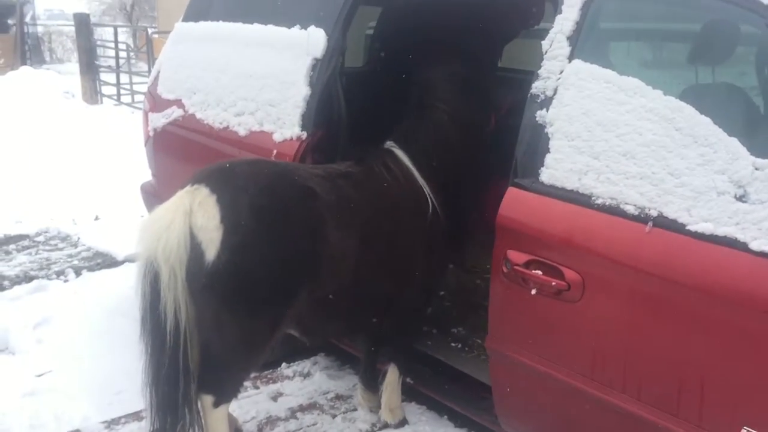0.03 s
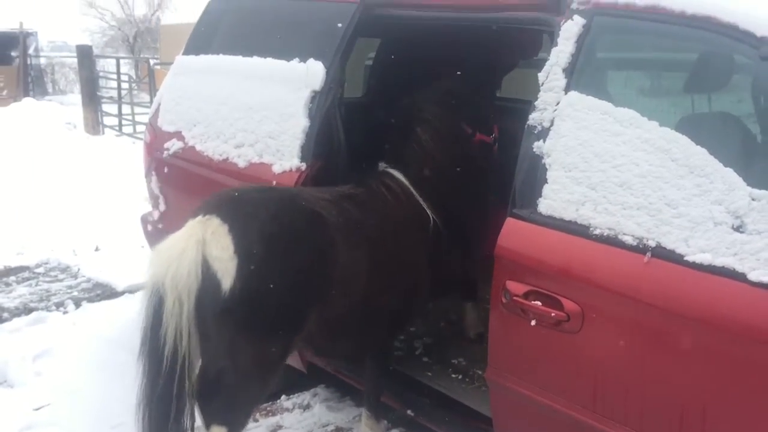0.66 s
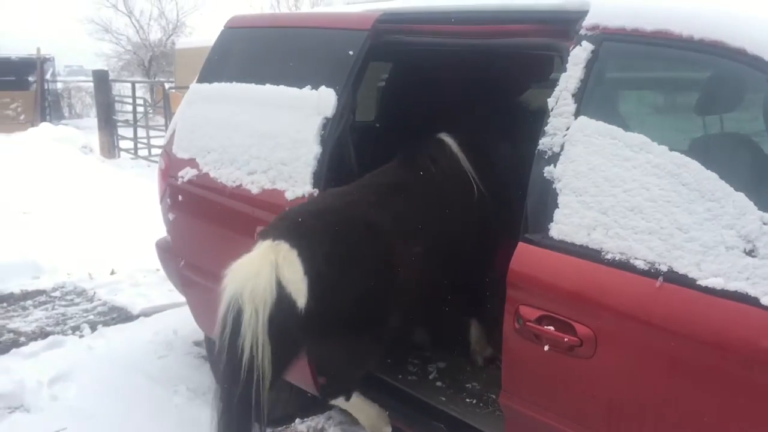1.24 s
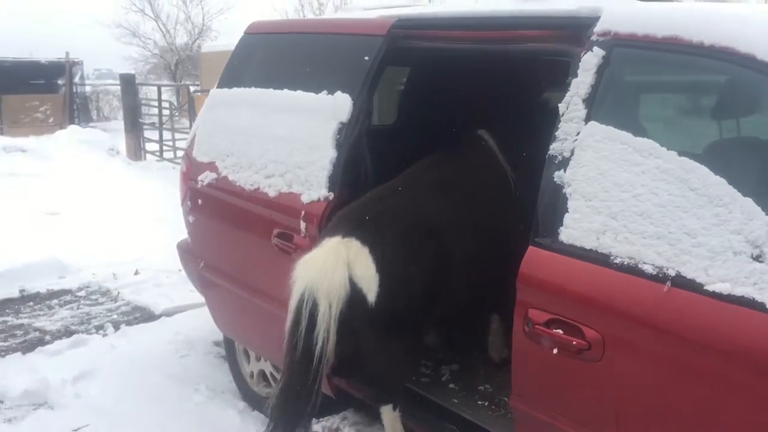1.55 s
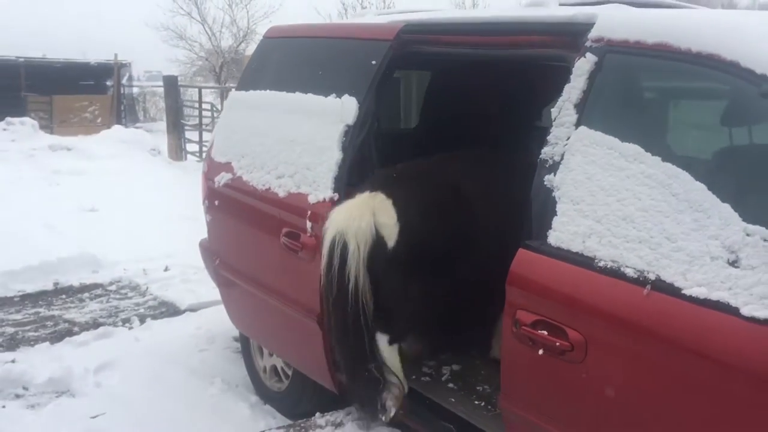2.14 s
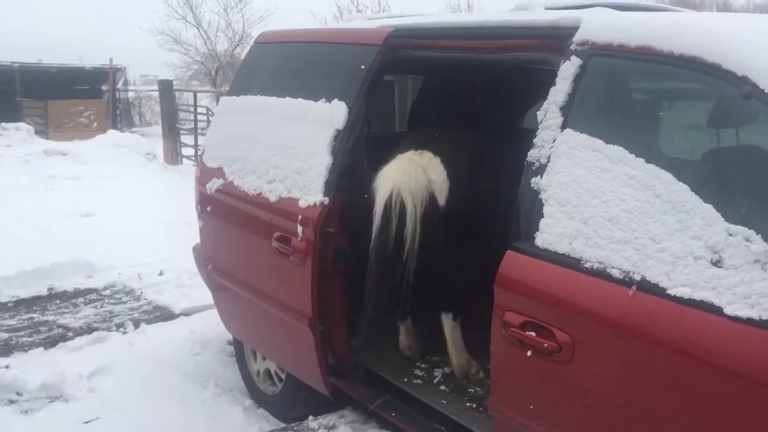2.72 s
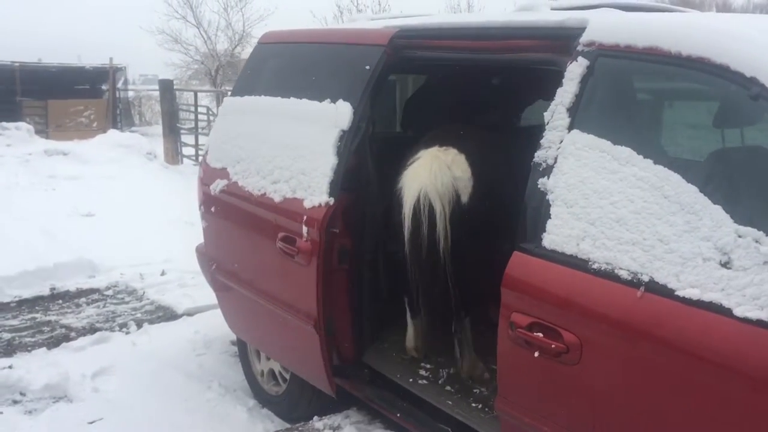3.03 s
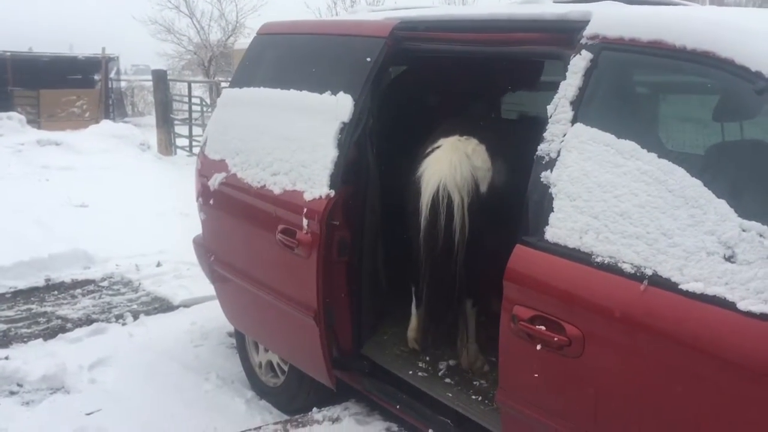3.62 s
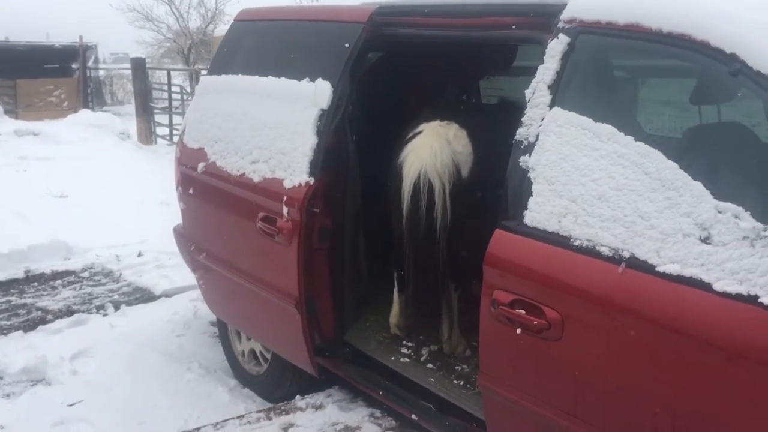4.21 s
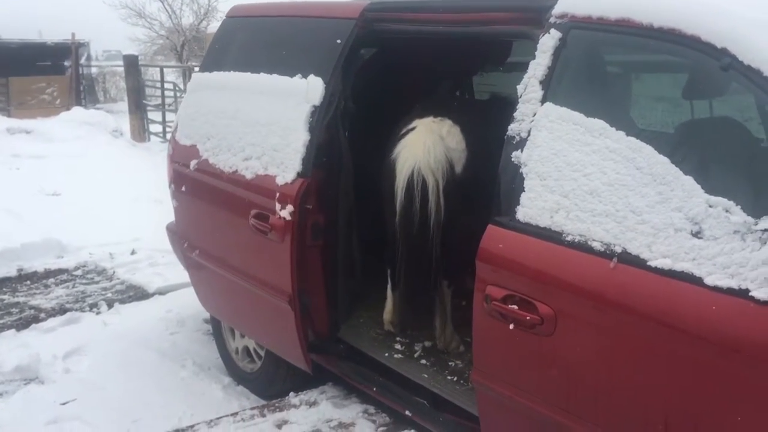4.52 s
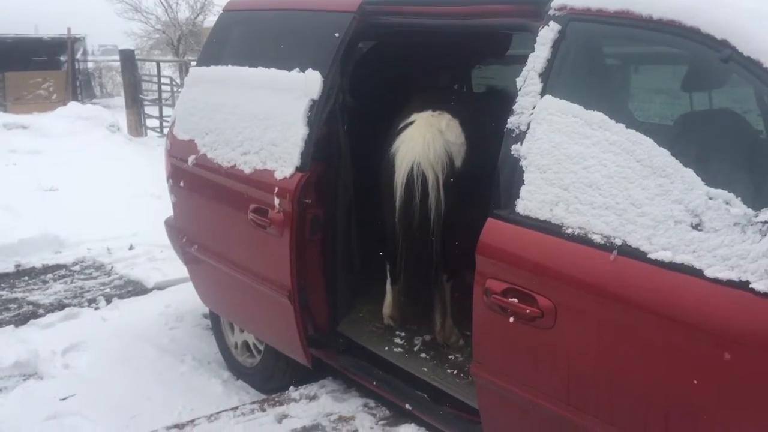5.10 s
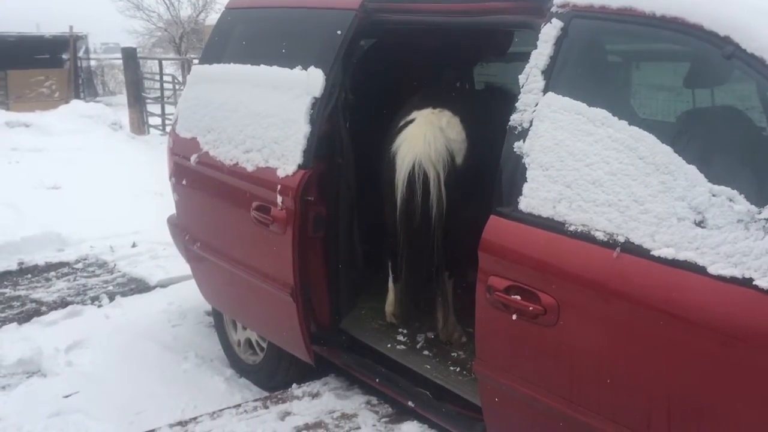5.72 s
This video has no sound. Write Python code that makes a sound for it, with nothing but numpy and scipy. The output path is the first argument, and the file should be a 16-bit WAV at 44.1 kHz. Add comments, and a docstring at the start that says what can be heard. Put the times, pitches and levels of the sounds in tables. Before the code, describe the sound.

A small horse climbs into a van, its hooves making irregular hollow knocks on the door sill and low, briefly booming thuds on the floor. Light scuffs and tiny ticks of ice fall between the steps, and one stamp lands louder than the rest. The steps end about halfway through, leaving only faint shuffling. It is heard from nearby in a quiet outdoor yard.

```python
"""A small horse boards a van

A small horse climbs from the snow through the side door. Its hooves excite the modes of sill and
panels as knocks, and its weight drives the carpeted floor into thuds and a low boom, which the cabin
briefly reverberates. Hooves scuff over packed snow by sliding friction, and bits of ice tick.
Then the horse stands inside, and only soft shuffling is left over a quiet winter yard."""
import sys
import numpy as np
from scipy import signal
from scipy.fft import rfft, irfft, next_fast_len
from scipy.io import wavfile
from scipy.ndimage import map_coordinates

SR = 44100
rng = np.random.default_rng(int(sys.argv[2]) if len(sys.argv) > 2 else 0)


def to_wav(s):
    """Save 16-bit WAV."""
    ch = np.atleast_2d(s).T  # columns
    pcm = np.round(np.clip(ch, -1, 1) * 32767)  # PCM
    wavfile.write(sys.argv[1], SR, pcm.astype(np.int16))


N = 258426
T = np.arange(SR // 2) / SR  # seconds since an impact


def amp(db):
    """Decibels to amplitude ratio."""
    return 10 ** (np.asarray(db) / 20)


def unit(x):
    """Normalisation to rms 1."""
    return x / np.sqrt(np.mean(x ** 2) + 1e-20)


def burst(x):
    """Normalisation of a transient to the energy of 20 ms at rms 1."""
    return x * np.sqrt(.02 * SR / (np.sum(x ** 2) + 1e-20))


def along(points, hz):
    """Interpolation of (frequency, value) points on a logarithmic frequency axis."""
    freqs, values = np.transpose(points)
    return np.interp(np.log(hz + 1), np.log(freqs + 1), values)


def filtered(x, gain):
    """Zero-phase filtering: the spectrum is multiplied by gain(hz)."""
    size = next_fast_len(len(x) + 8192)
    return irfft(rfft(x, size) * gain(np.fft.rfftfreq(size, 1 / SR)), size)[:len(x)]


def noise(spectrum, size, spiky_db=0):
    """Coloured noise of rms 1; random amplitude modulation in half-millisecond grains makes it gritty."""
    grains = np.repeat(rng.standard_normal(size // 22 + 1), 22)[:size]
    white = rng.standard_normal(size) * amp(spiky_db * grains)
    return unit(filtered(white, lambda hz: amp(along(spectrum, hz))))


def fade(t60, attack_s):
    """Envelope of a damped vibration: a quick rise, then exponential decay by 60 dB in t60 seconds."""
    return (1 - np.exp(-T / attack_s)) * np.exp(-np.log(1000) * T / t60)


def swell(peak_s, rise_s, fall_s):
    """Gaussian envelope with its own width on each side of the peak."""
    t = np.arange(N) / SR - peak_s
    width_s = np.where(t < 0, rise_s, fall_s)
    return np.exp(-.5 * np.minimum((t / width_s) ** 2, 50))


def add(track, start_s, x):
    """Superposition of x on the track from start_s."""
    part = track[max(round(start_s * SR), 0):][:len(x)]
    part += x[:len(part)]


def reflections(x, spread_s=.006, strength=0.86, count=6):
    """Comb filtering: echoes from nearby surfaces interfere, giving each spot its own hollow colour."""
    out = x.copy()
    for delay_s, gain in rng.uniform([.0005, -1], [spread_s, 1], (count, 2)):
        add(out, delay_s, strength * gain * x)
    return out * np.linalg.norm(x) / np.linalg.norm(out)


# spectrum of the outdoor air: frequency_hz, density_db
YARD_SPECTRUM = [(15, -30), (25, -10), (44, 0.5), (64, 0), (102, -4.5), (354, -10), (394, -16.5),
                 (754, -12), (863, -15.5), (1230, -19), (1400, -24), (2480, -27), (3160, -27.5),
                 (5280, -31.5), (16000, -38.5)]
# its slow drift in level: time_s, level_db
YARD_LEVEL = [(0, -61), (2.7, -60), (4.2, -60.5), (5.86, -63)]


def yard():
    """Ambient noise: faint, nearly steady outdoor air with its greatest density in the bass."""
    level_db = np.interp(np.arange(N) / SR, *np.transpose(YARD_LEVEL))
    return amp(level_db) * noise(YARD_SPECTRUM, N)


# spectra of a tick's hollow body and its bright edge: frequency_hz, density_db
CLACK_SPECTRUM = [(900, -38), (1600, -9), (2300, 4), (3700, 5), (5000, -6), (7000, -6), (8500, -45),
                  (16000, -15)]
SPARKLE_SPECTRUM = [(1500, 13), (5000, -6), (9000, 13.5), (12500, 15), (16000, 11)]
# impacts of bits of ice: start_s, clack_db, sparkle_db, clack_t60_s
ICE_TICKS = [ (0.042, -46.5, -64, 0.038), (0.049, -52.5, -67, 0.094), (0.301, -53, -57.5, 0.095),
             (0.687, -60, -55.5, 0.044), (0.708, -65, -58, .026), (1.835, -62, -56, 0.014),
             (2.21, -63, -48, 0.0074), (2.702, -87, -58.5, 0.091), (2.865, -73, -83, .05),
             (2.902, -73.5, -82, .045), (4.242, -71, -62.5, .09), ]


def ice_ticks():
    """Impact of small hard bodies: a short clack, and a bright edge that decays twice as fast."""
    out = np.zeros(N)
    for start_s, clack_db, sparkle_db, t60 in ICE_TICKS:
        clack = noise(CLACK_SPECTRUM, len(T), spiky_db=4.5) * fade(t60, attack_s=0.00039)
        clack = reflections(clack, spread_s=0.0051, strength=0.44)
        sparkle = noise(SPARKLE_SPECTRUM, len(T)) * fade(.5 * t60, attack_s=0.0006)
        add(out, start_s, amp(clack_db) * burst(clack) + amp(sparkle_db) * burst(sparkle))
    return out


def thud(hz, rise_at_180hz_s=0.0058):
    """Heavily damped oscillation: weight bounces on the floor for a few cycles that swell and die."""
    rise_s = rise_at_180hz_s * (180 / hz) ** .5
    age = T / rise_s
    return burst(age ** 2 * np.exp(-2 * age) * np.sin(2 * np.pi * hz * T))


# low modes of the floor pan: pitch_hz, level_db, t60_s
FLOOR_MODES = [(67.7, -0.5, 0.29), (80.7, 4, 0.15), (104.2, -14, 0.82), (141.6, 4, 0.13), (170.8, -4, 0.24),
               (191.2, -4, 0.18), (251, -22.5, 0.34)]


def floor_boom():
    """Free vibration of a plate: the floor pan takes up the load slowly and rings on in its low modes."""
    out = np.zeros(len(T))
    for hz, db, t60 in FLOOR_MODES:
        gain = amp(db + 0.95 * rng.standard_normal())
        out += gain * np.sin(2 * np.pi * hz * T) * fade(t60, attack_s=0.0077)
    return burst(out)


def tread(db, hz):
    """Transient loading: weight lands with a thud, the softer the slower, booms and rebounds."""
    rise_at_180hz_s = 0.0061 * 2 ** ((-24 - db) / 32)  # doubles for every 32 dB softer
    boom_db = -18 * max(np.log2(hz / 180), 0)  # thuds above 180 Hz stir the floor pan less
    overtone = amp(-13) * thud(1.765 * hz)
    out = thud(hz, rise_at_180hz_s) + overtone + amp(boom_db) * floor_boom()
    rebound = amp(-8.5) * thud(0.88 * hz)
    add(out, 0.03157, rebound)
    return amp(db) * out


# a leg putting weight on the floor: start_s, level_db, pitch_hz
TREADS = [ (0.208, -49.5, 161), (0.266, -44.5, 174), (0.691, -34.5, 353), (0.714, -39, 153),
          (0.865, -38.5, 162), (1.174, -47, 137.5), (1.285, -29.5, 146), (1.357, -44, 107),
          (1.483, -35, 127.5), (1.692, -38, 120), (1.783, -32.5, 141), (2.164, -32, 205),
          (2.187, -25, 196.6), (2.230, -29, 120), (2.281, -45, 103), (2.528, -46, 104), (3.044, -48.5, 75),
          (3.935, -52, 161.5), ]


def treads(shift_count=16, shift_db=-53, shift_hz=142.6):
    """Repeated excitation: firm steps, and small shifts of weight between them, keep the floor moving."""
    out = np.zeros(N)
    for start_s, db, hz in TREADS:
        add(out, start_s, tread(db, hz))
    times_s, gap_s = np.linspace(0.87, 1.9, shift_count, retstep=True)
    for time_s in times_s:
        late, size, pitch = rng.uniform(-1, 1, 3)
        shift = tread(shift_db + 2 * size, shift_hz * 2 ** (0.33 * pitch))
        add(out, time_s + .5 * gap_s * late, shift)
    return out


# modes of the hard plastic sill trim: pitch_hz, level_db, t60_s
SILL_MODES = [(1955, -8.5, 0.041), (2430, -9, 0.039), (2580, -4, 0.019), (2910, -8, 0.012),
              (3020, -21, 0.006), (3170, -2, 0.01), (3320, 11, 0.01), (3530, -7, 0.015), (4280, -4, 0.035)]


def sill(contact, ring_db):
    """Resonance: a contact is heard directly and convolved with the trim's short impulse response."""
    ring = sum(amp(db) * np.cos(2 * np.pi * hz * T) * np.exp(-np.log(1000) * T / t60)
               for hz, db, t60 in SILL_MODES)
    ringing = signal.fftconvolve(contact, ring / np.linalg.norm(ring))[:len(contact)]
    return contact + amp(ring_db) * ringing


# spectrum of hoof horn meeting the sill: frequency_hz, density_db
CRACK_SPECTRUM = [(500, -5.5), (1100, -1.5), (1600, -4), (2100, -3.5), (2600, -7.5), (3400, -13),
                  (3800, -11.5), (4400, -17), (5200, -19.5), (9000, -23.5), (16000, -42.5)]


def crack(db, hard_blow_db=-30):
    """Brief contact is broadband: horn snaps on the sill and chatters; soft blows barely ring the trim."""
    snap = fade(t60=0.0043, attack_s=0.00056)
    chatter = amp(-13) * fade(t60=0.049, attack_s=0.0046)
    contact = noise(CRACK_SPECTRUM, len(T)) * (snap + chatter)
    return amp(db) * burst(sill(contact, ring_db=-3 + min(db - hard_blow_db, 0)))


# modes of the sill and floor panels: pitch_hz, weight_db
PANEL_MODES = [(270, 14), (302, 13.5), (335, 10.5), (378, 0.5), (445, 4), (505, -3.5), (590, -1),
               (680, -1.5), (728, -6.5), (802, -2), (883, -3.5), (990, -3), (1090, -38), (1258, -3),
               (1421, -5), (1556, -17)]


def knock(centre_hz, width_octaves=0.65):
    """Selective excitation: each spot and hardness of contact favours its own band of panel modes."""
    def favour(hz):
        return 1 / (1 + (np.log2((hz + 1) / centre_hz) / width_octaves) ** 2) ** 1.8

    hz, db = np.transpose(PANEL_MODES)
    gains = amp(db + 2 * rng.standard_normal(len(hz))) * favour(hz)
    phases = rng.uniform(0, 2 * np.pi, (len(hz), 1))
    modes = gains @ np.sin(2 * np.pi * hz[:, None] * T + phases)
    trim = filtered(rng.standard_normal(len(T)), favour)  # loose trim adds countless small modes
    t60 = 0.097 / (1 + (centre_hz / 720) ** 8.6)  # damping climbs steeply above 720 Hz
    return burst((unit(modes) + amp(-11) * unit(trim)) * fade(t60, attack_s=0.4 / centre_hz))


# hooves striking the sill and floor: start_s, knock_db, centre_hz, crack_db
HOOF_STRIKES = [ (0.255, -48, 630, -58.5), (0.267, -50, 483, -75), (0.686, -38, 420, -46.5),
                (0.693, -27, 680, -41), (0.709, -33.5, 746, -39), (0.851, -40, 560, -68),
                (1.075, -49.5, 560, -72), (1.279, -26, 760, -30), (1.286, -32, 424, -62),
                (1.481, -38.5, 412, -50.5), (1.627, -56, 730, -64.5), (1.683, -52, 590, -62.5),
                (1.765, -31.5, 594, -68), (1.785, -35.5, 700, -57.5), (1.883, -38, 835, -86),
                (2.163, -44, 477, -58), (2.186, -32.5, 683, -45), (2.208, -42, 680, -42),
                (2.493, -51, 654, -55.5), (2.512, -47, 810, -56), ]


def hoof_strikes():
    """Impulsive excitation: horn cracks on the sill and knocks the panels, over a small thud."""
    out = np.zeros(N)
    tap = amp(-6.5) * thud(hz=194.3)
    for start_s, knock_db, centre_hz, crack_db in HOOF_STRIKES:
        add(out, start_s, crack(crack_db) + amp(knock_db) * (knock(centre_hz) + tap))
    return out


# spectra of crushed grains, rubbed floor and squeaking snow: frequency_hz, density_db
GRIT_SPECTRUM = [(400, -43), (1200, 4.5), (2100, 3), (3400, -0.5), (5000, -9), (8000, -15.5), (16000, -27)]
RUB_SPECTRUM = [(80, -1.5), (200, 0.5), (500, -1), (800, 2), (1100, -9.5), (1700, -18), (4000, -35.5)]
SQUEAK_SPECTRUM = [(1200, -63), (1750, -0.5), (1950, 2.5), (2180, 7.5), (2450, -31), (3500, -66)]
# hoof slides over packed snow and carpet: peak_s, rise_s, grit_db, rub_db
SCUFFS = [ (0.27, 0.013, -64, -61.5), (0.883, 0.04, -60, -52.5), (0.972, 0.021, -64.5, -59.5),
          (1.1, .011, -62.5, -49), (1.374, 0.015, -61.5, -58), (1.492, 0.011, -53.5, -43),
          (1.754, 0.043, -54, -49), (2.041, 0.0098, -53.5, -63), (2.203, 0.022, -46.5, -36.5),
          (2.255, 0.017, -63.5, -46.5), (2.515, 0.017, -52, -42.5), ]


def scuffs():
    """Sliding friction: a hoof crushes snow and rubs the floor; the squeak grows with the rubbing."""
    strokes = np.array([swell(peak_s, rise_s, 0.9 * rise_s) for peak_s, rise_s, *_ in SCUFFS])
    grit_envelope, rub_envelope = amp(np.array(SCUFFS)[:, 2:]).T @ strokes
    crunch = reflections(grit_envelope * noise(GRIT_SPECTRUM, N, spiky_db=7.5))
    rub = noise(RUB_SPECTRUM, N, spiky_db=3.5)
    squeak = amp(-12) * noise(SQUEAK_SPECTRUM, N, spiky_db=-8.0)
    return crunch + rub_envelope * (rub + squeak)


# modes of the hollow door step: pitch_hz, relative_db, rise_at_180hz_s
STEP_MODES = [(190, -1.5, 0.0061), (466, -5, 0.012), (667, -20.5, 0.0036)]


def step_thump(start_s=1.764, level_db=-17.5):
    """Damped resonance: the hollow step answers a hind hoof's stamp with a few short, pitched modes."""
    out = np.zeros(N)
    for hz, relative_db, rise_at_180hz_s in STEP_MODES:
        add(out, start_s, amp(level_db + relative_db) * thud(hz, rise_at_180hz_s))
    return out


# spectrum of soft friction: frequency_hz, density_db
RUSTLE_SPECTRUM = [(400, -1.5), (850, 5), (1150, -1.5), (1500, 4.5), (2000, 5), (2600, 5), (3300, 2),
                   (5000, -3), (9000, -8.5), (16000, -29)]
# small movements of the standing horse: peak_s, rise_s, rustle_db, fizz_db
SHUFFLES = [ (4.026, 0.017, -65.5, -86), (4.15, 0.013, -65.5, -83), (4.524, 0.02, -65, -80),
            (4.68, 0.029, -58, -65), (4.861, .015, -61, -69), (4.919, .022, -60, -74),
            (5.073, 0.0046, -68, -71), (5.15, 0.041, -72.5, -80), (5.281, 0.019, -57.5, -76),
            (5.477, 0.013, -58.5, -59), (5.53, 0.029, -63, -91), (5.7, 0.011, -64.5, -84),
            (5.825, 0.017, -56.5, -58.5), ]


def shuffles():
    """Light friction: short strokes, each coloured by its own reflections, over a long, faint rustle."""
    rustle = noise(RUSTLE_SPECTRUM, N, spiky_db=2) + amp(-7.5) * noise(SQUEAK_SPECTRUM, N, spiky_db=5.5)
    fizz = noise(SPARKLE_SPECTRUM, N, spiky_db=12)
    out = amp(-72.5) * swell(peak_s=4.87, rise_s=0.69, fall_s=0.84) * rustle
    for peak_s, rise_s, rustle_db, fizz_db in SHUFFLES:
        friction = amp(rustle_db) * rustle + amp(fizz_db) * fizz
        out += reflections(swell(peak_s, rise_s, 0.85 * rise_s) * friction, strength=0.97)
    return out


# reverberation time of the cabin: frequency_hz, t60_s
CABIN_DECAY = [(100, 0.41), (500, 0.19), (2500, 0.13), (6000, 0.17), (15000, 0.26)]


def cabin(x):
    """Reverberation: absorption by the upholstery keeps the tail short, and the bass lasts longest."""
    hz, t, spectra = signal.stft(rng.standard_normal(len(T)), SR, nperseg=256)
    decay = np.exp(-np.log(1000) * t / along(CABIN_DECAY, hz)[:, None])
    _, tail = signal.istft(spectra * decay, SR, nperseg=256)
    response = np.pad(tail / np.linalg.norm(tail), (SR // 200, 0))  # arrives 5 ms late
    return signal.fftconvolve(x, response)[:N]


def scene():
    """Direct and reverberant sound add; the step lies in the open and couples less to the cabin."""
    horse = hoof_strikes() + treads() + scuffs()
    step = step_thump()
    reverberation = amp(-13.0) * cabin(horse + amp(-3.5) * step)
    return (horse + step + reverberation + ice_ticks() + shuffles() + yard())[None]


def record(dry, bass_hz=50, top_hz=16100):
    """Band limiting: a small microphone loses the deep bass, and nothing passes above top_hz."""
    highpass = signal.butter(2, bass_hz, "highpass", fs=SR, output="sos")
    thin = signal.sosfilt(highpass, dry[0])
    return filtered(thin, lambda hz: hz < top_hz)[None]


dry = scene()
out = record(dry)
to_wav(out)
```